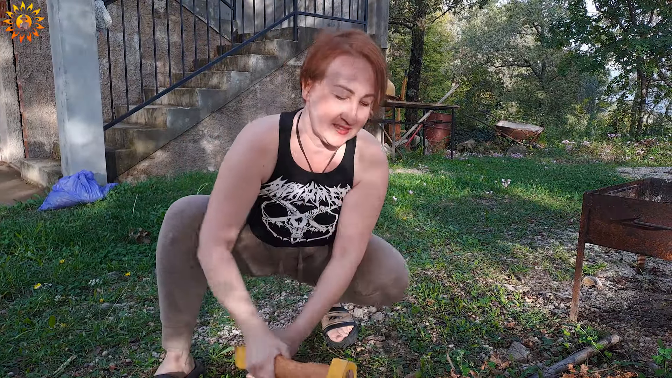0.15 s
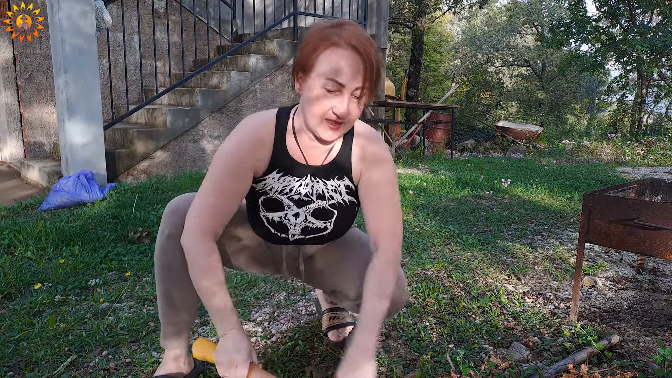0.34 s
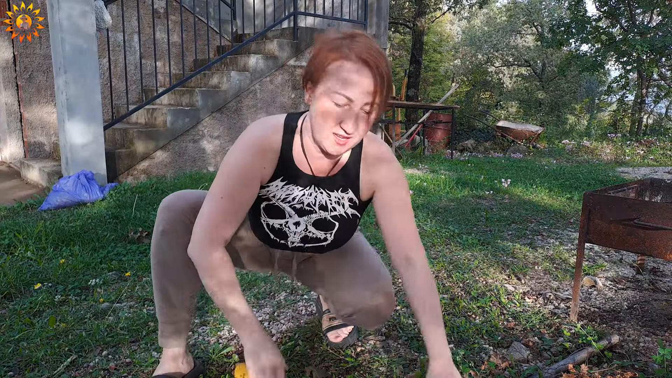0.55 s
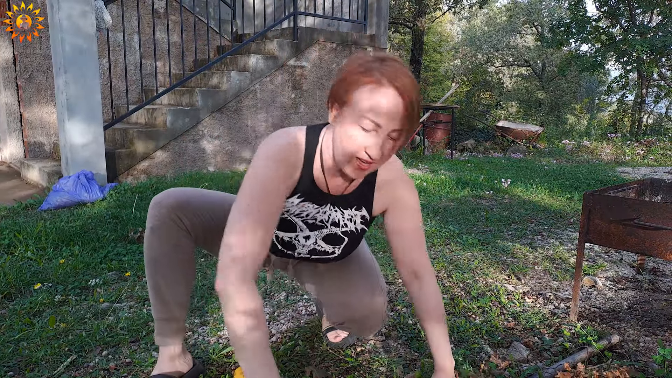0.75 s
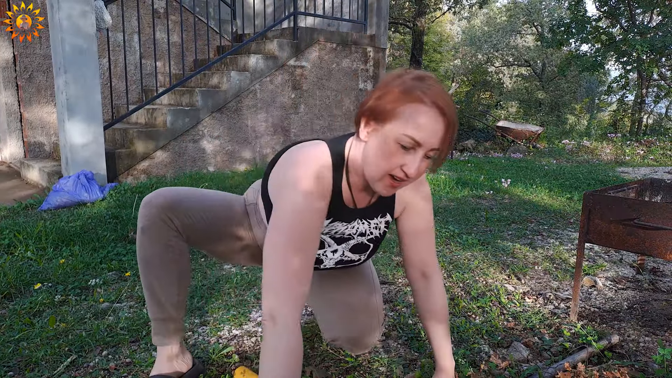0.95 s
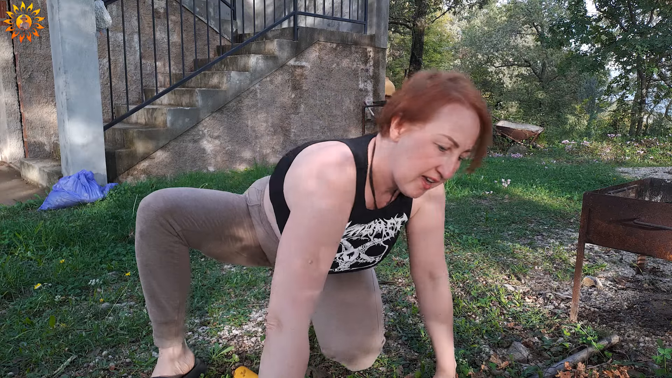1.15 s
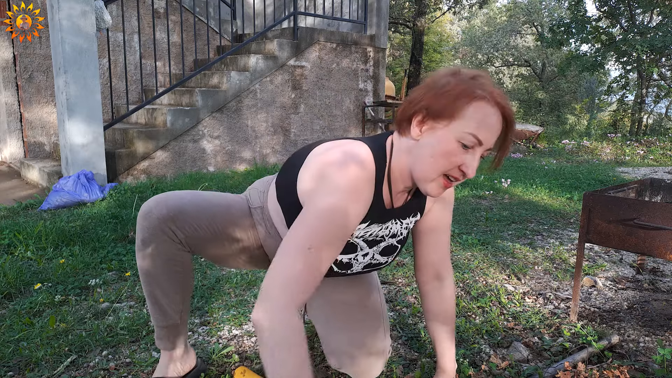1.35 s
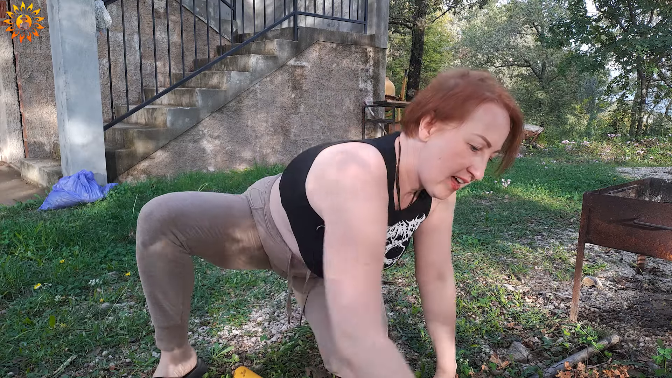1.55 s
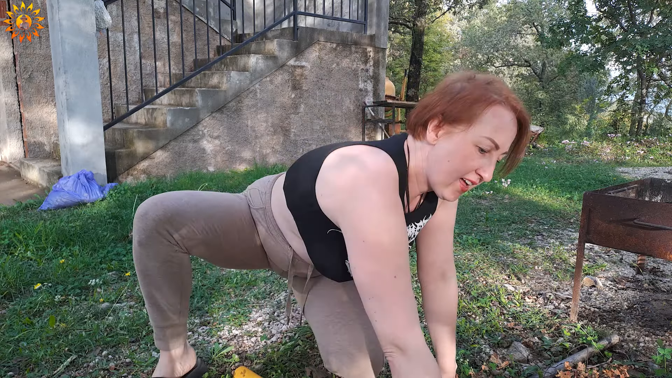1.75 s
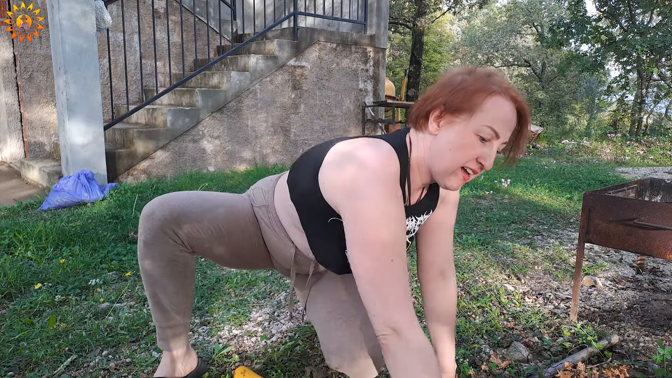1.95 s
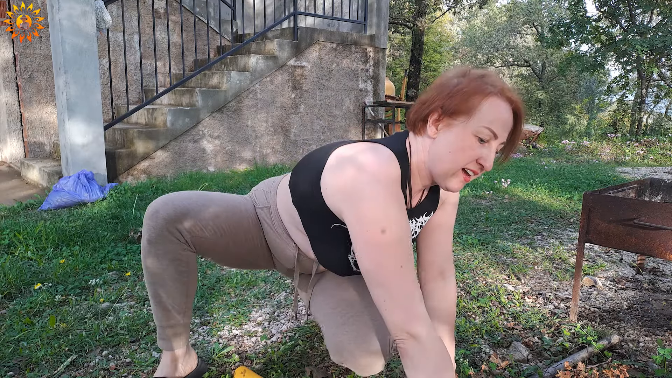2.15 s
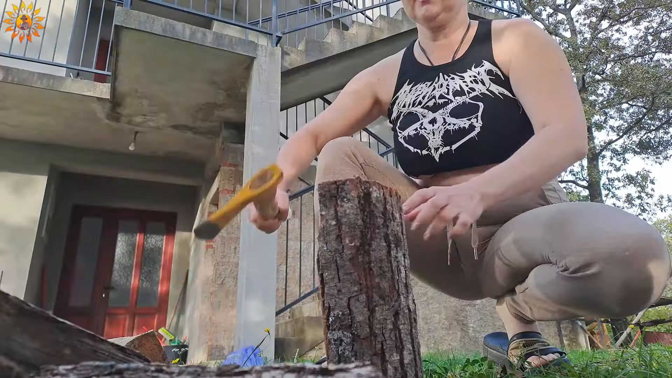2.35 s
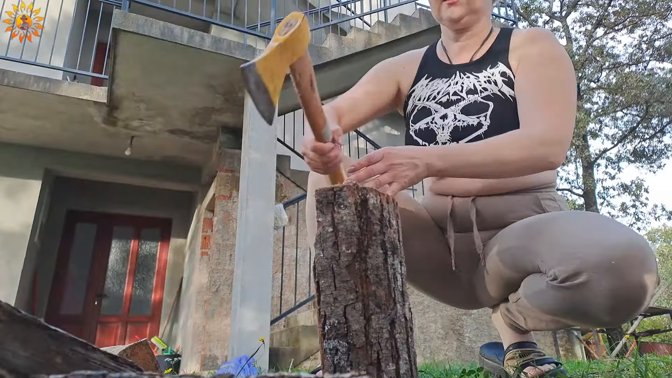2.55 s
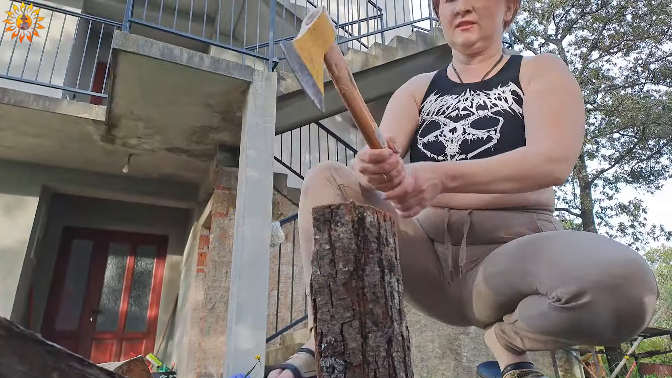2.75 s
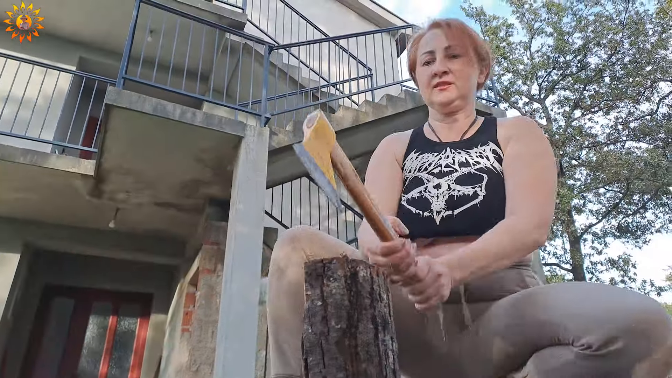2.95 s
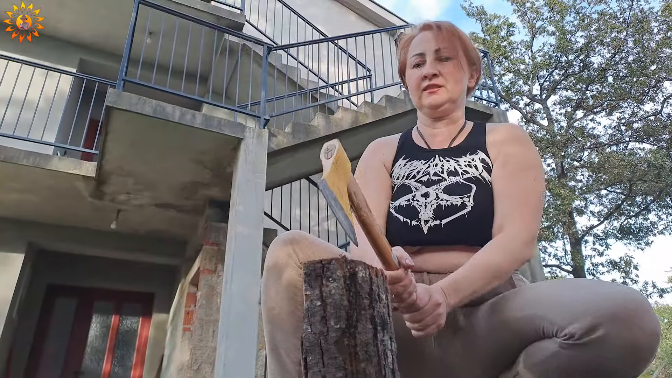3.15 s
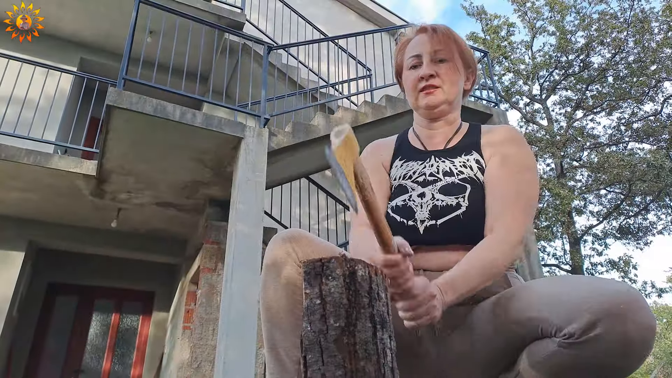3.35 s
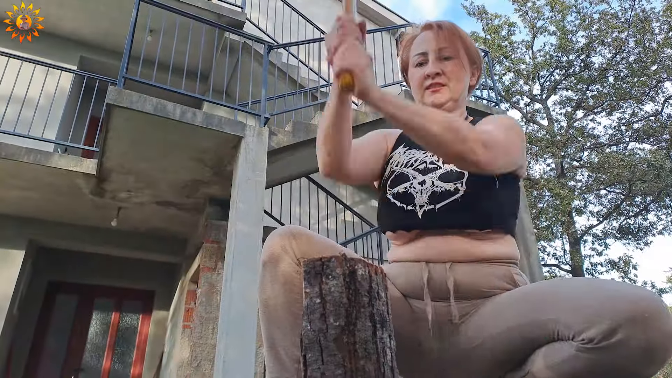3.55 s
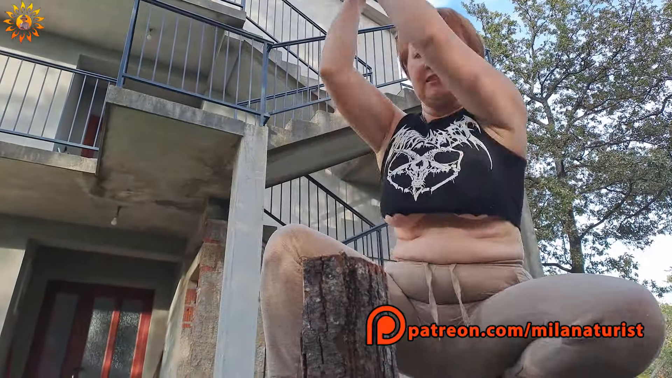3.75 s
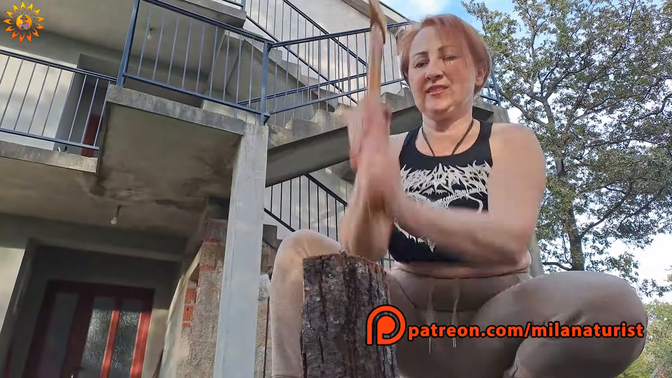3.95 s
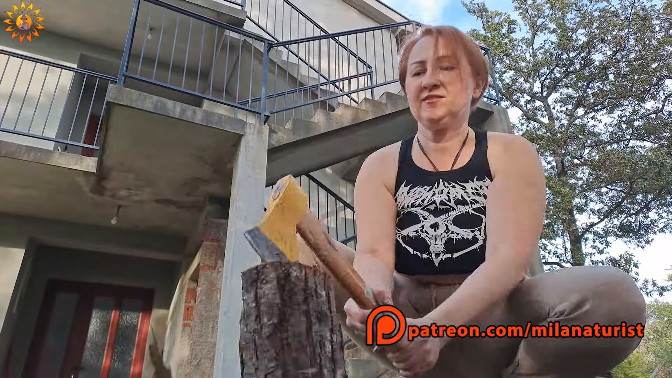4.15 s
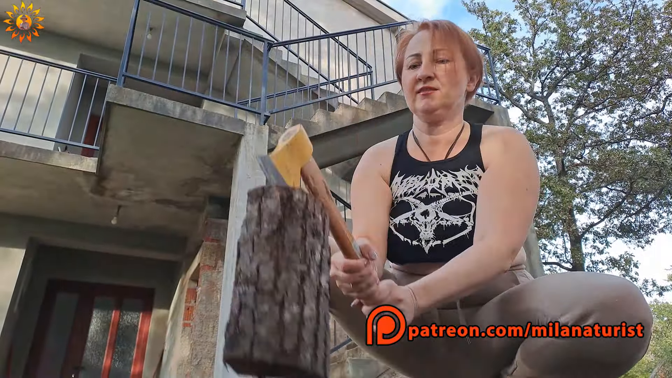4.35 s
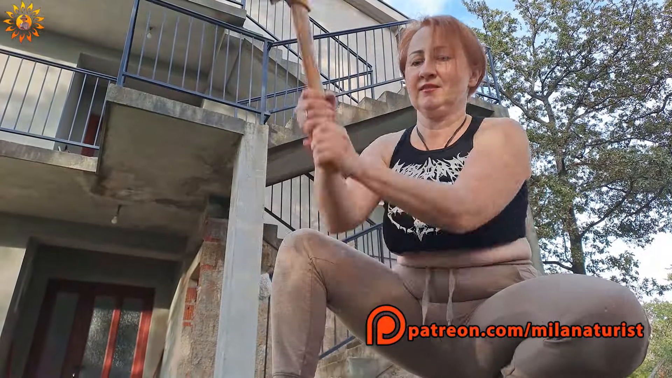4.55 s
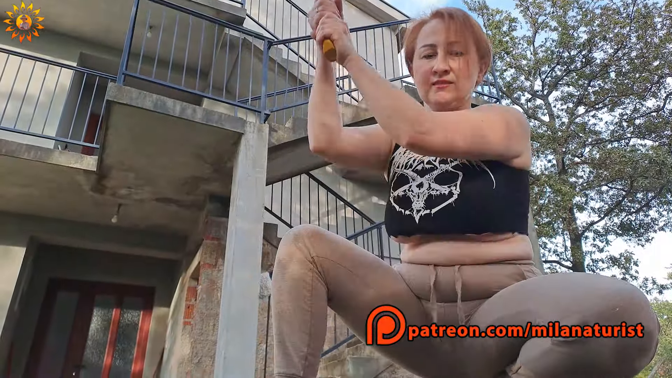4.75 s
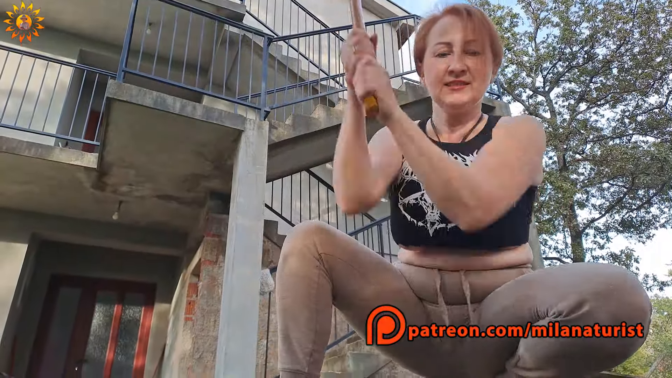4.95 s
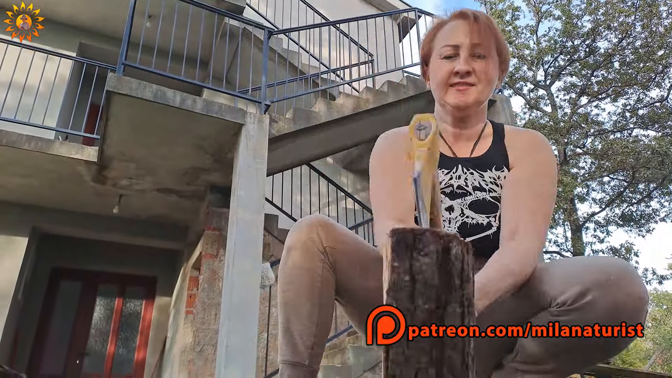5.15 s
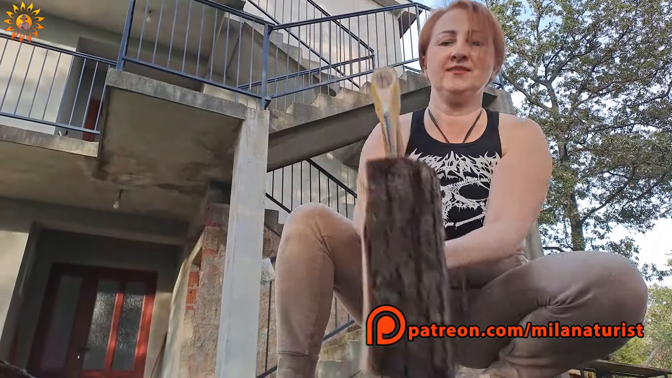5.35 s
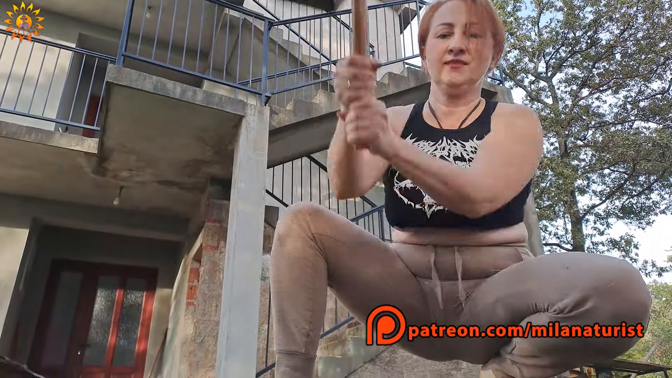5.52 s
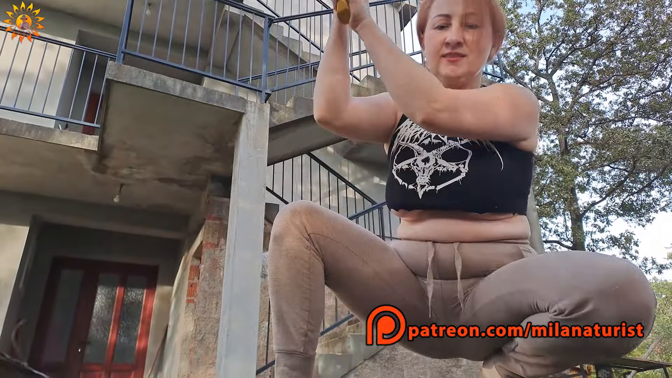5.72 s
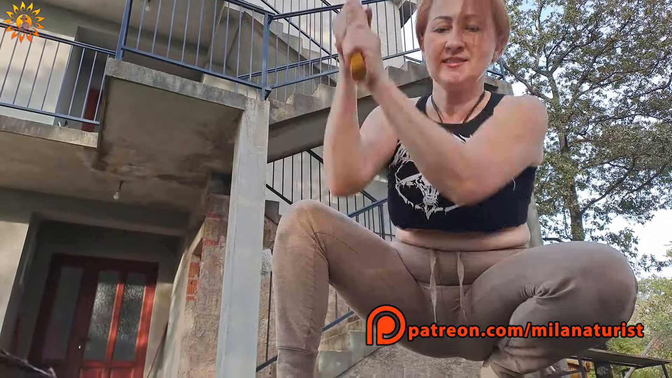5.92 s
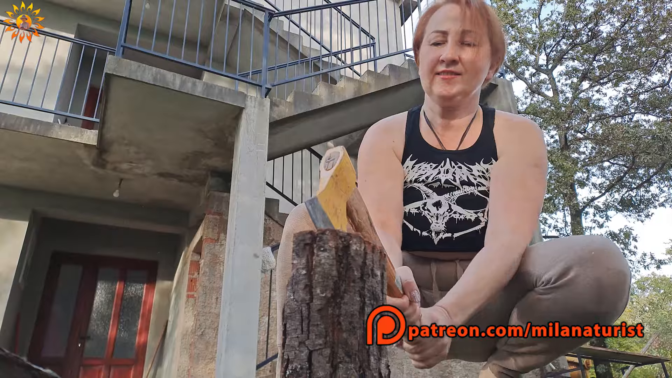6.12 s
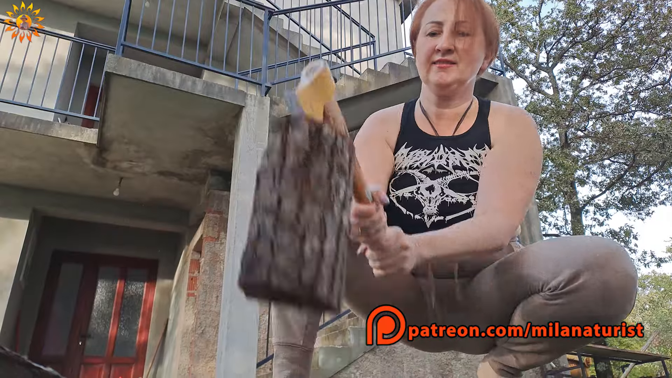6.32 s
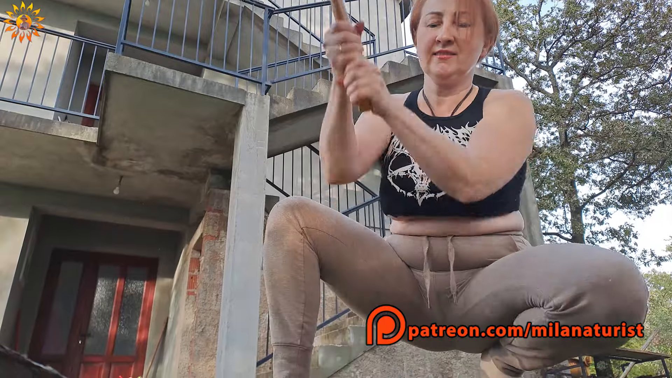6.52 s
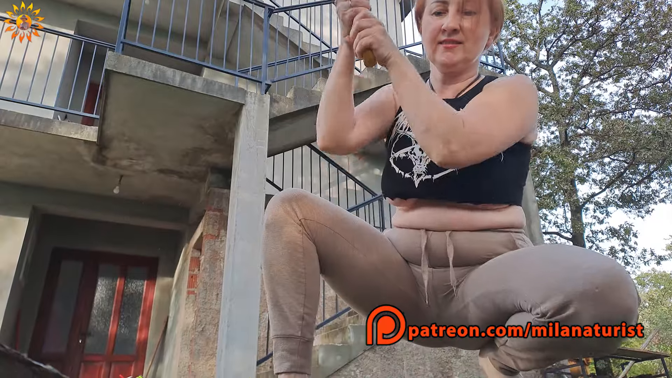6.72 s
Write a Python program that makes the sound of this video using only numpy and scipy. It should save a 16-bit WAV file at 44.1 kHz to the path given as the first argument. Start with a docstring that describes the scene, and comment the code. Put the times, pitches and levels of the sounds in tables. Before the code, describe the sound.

A hatchet head rings as it is tossed aside and sticks clack over an engine drone, then three echoing chops hit a log.

```python
"""A hatchet's steel head rings as it is tossed aside and dry sticks knock together, over the drone of an engine.
Then the drone stops, a hand brushes bark and three blows land on an upright log, each with an echo and splinters.
Shaped noise makes the backgrounds, rustles and cracks; dying sine waves make steel, sticks, log and taps.
Noise bursts that follow the blows are the echo off the house. Two microphones stand a hand apart."""
import sys
import numpy as np
from scipy import signal
from scipy.fft import rfft, irfft, next_fast_len
from scipy.io import wavfile
from scipy.ndimage import uniform_filter1d

SR = 44100
rng = np.random.default_rng(int(sys.argv[2]) if len(sys.argv) > 2 else 0)


def file_out(sig):
    """Save sig as 16-bit WAV at sys.argv[1]."""
    # one column per channel
    cols = np.atleast_2d(sig).T
    # limit, then scale
    lim = np.clip(cols, -1, 1)
    pcm = np.round(lim * 32767).astype(np.int16)
    wavfile.write(sys.argv[1], SR, pcm)


N = 298997
T = np.arange(N) / SR

# The engine drawing nearer. Each row: time in seconds, then levels of hum, roar and treble in dB.
ENGINE_LEVELS = [(0, -42, -59, -71), (.2, -42.5, -62, -90.5), (.48, -42, -63, -81.5),
                 (.65, -39.5, -59.5, -73), (.92, -43, -59.5, -86), (1.25, -40, -54, -83),
                 (1.55, -43.5, -52, -75), (1.82, -34.5, -46.5, -64), (1.99, -35.5, -47.5, -72),
                 (2.09, -31, -49.5, -71), (2.18, -32.5, -49.5, -68.5), (2.28, -43.5, -51, -68)]
# Fibres tearing at each blow. Each row: start in seconds, level in dB, length in seconds,
# left over right in dB, extra level thrown towards the house in dB.
FIBRE_CRACKS = [(4.0299, -21, 0.006, 1, 2.5), (5.103, -19, 0.0073, 1, -10), (6.058, -17.5, 0.008, 2.5, 1.5)]


def from_db(db):
    """Turns decibels into a plain multiplier."""
    return 10 ** (np.asarray(db) / 20)


def rms_one(x):
    """Scales a sound to an average strength (RMS) of 1."""
    return x / np.sqrt(np.mean(x ** 2) + 1e-20)


def at_hz(points, hz):
    """Reads a curve of (Hz, value) points, with pitch on a logarithmic scale."""
    points = np.array(points)
    return np.interp(np.log(hz + 1), np.log(points[:, 0]), points[:, 1])


def coloured(x, spectrum):
    """Filters each channel with a curve of (Hz, dB) points."""
    hz = np.fft.rfftfreq(x.shape[-1], 1 / SR)
    return irfft(rfft(x) * from_db(at_hz(spectrum, hz)), x.shape[-1])


def sides(pan_db):
    """Left and right multipliers; a positive value makes the left louder."""
    return from_db(np.array([[.5], [-.5]]) * pan_db)


def add(out, x, s):
    """Mixes x into out from time s in seconds."""
    i = round(s * SR)
    out[..., i:i + x.shape[-1]] += x[..., :N - i]


def decay(t60, size):
    """A fade that loses 60 dB in t60 seconds."""
    return from_db(-60 * np.arange(size) / SR / max(t60, .001))


def drift(rate):
    """A slow random curve: straight lines between normal random values, two times rate of them a second."""
    knots = np.arange(0, T[-1] + 1, .5 / rate)
    return np.interp(T, knots, rng.standard_normal(len(knots)))


def ring(push, hz, t60):
    """A resonance: a unit click sets a sine of height 1 ringing, which loses 60 dB in t60 seconds."""
    r, w = from_db(-60 / (t60 * SR)), 2 * np.pi * hz / SR
    return signal.lfilter([0, np.sin(w)], [1, -2 * r * np.cos(w), r * r], push + 1e-18)


def band_levels(rows, follows):
    """Times and five band levels from three curves; two bands follow part of a neighbour's swing."""
    s, bass, middle, treble = np.transpose(rows)
    (low_db, low_share), (high_db, high_share) = follows
    low = low_db + low_share * (middle - middle.mean())
    high = high_db + high_share * (treble - treble.mean())
    return s, bass, low, middle, high, treble


def background(levels, spectrum, hums, patchy_db):
    """Stereo noise, alike in the bass; each octave follows the band levels and flickers on its own."""
    # The five bands whose levels are set. Each row: lower and upper edge in Hz.
    bands = [(40, 130), (130, 500), (500, 4200), (4700, 8000), (9000, 12300)]
    # How alike left and right are. Each row: Hz, likeness from -1 (opposite) to 1 (same).
    likeness = [(110, 0.98), (290, 0.7), (640, 0.45), (1400, 0.06), (3000, -0.37)]
    size = next_fast_len(N)
    hz = np.fft.rfftfreq(size, 1 / SR)
    alike = np.clip(at_hz(likeness, hz), -1, 1)
    mid, side = rfft(rng.standard_normal((2, size))) * from_db(at_hz(spectrum, hz))
    both = np.sqrt(1 + alike) * mid + np.sqrt(1 - alike) * side * [[1], [-1]]
    for hum_hz, width, lift_db in hums:
        both = both * (1 + (from_db(lift_db) - 1) / (1 + (2 * (hz - hum_hz) / width) ** 2))
    # how far each band must be raised to reach its set level
    power = 2 * np.abs(both.mean(axis=0)) ** 2 / size ** 2
    s, *columns = levels
    lifts = []
    for column, (low, high) in zip(columns, bands):
        lifts.append(column - 10 * np.log10(power[(hz >= low) & (hz < high)].sum()))
    band_centres = np.sqrt(np.prod(bands, axis=1))
    out = 0
    for centre in 2. ** np.arange(5, 15):
        # neighbouring octaves overlap and add up to the whole
        share = np.clip(1 - np.abs(np.log2(np.clip(hz, 32, 16384) / centre)), 0, 1)
        lift_db = [np.interp(np.log(centre), np.log(band_centres), row) for row in np.transpose(lifts)]
        level_db = np.interp(T, s, lift_db) + patchy_db * drift(9)
        out = out + irfft(both * share, size)[:, :N] * from_db(level_db)
    return out


def quiet_yard():
    """Far traffic and air: shaped noise with a faint band of hiss."""
    # Each row: time in seconds, then levels of bass, middle and treble in dB.
    rows = [(2.3, -61, -68.5, -81.5), (2.45, -67.5, -65.5, -80.5), (2.92, -68.5, -60.5, -81),
            (3.7, -63.5, -71.5, -86), (4.1, -57, -70, -83.5), (4.33, -68.5, -79, -89.5),
            (4.8, -68, -81.5, -96.5), (5.22, -60, -71.5, -77), (5.55, -60, -74, -91),
            (5.9, -60.5, -69.5, -93.5), (6.19, -54.5, -67.5, -74.5), (6.36, -65, -78.5, -91.5),
            (6.78, -60, -71, -90)]
    # The two bands in between. Each row: mean level in dB, share of the middle's or treble's swing.
    follows = [(-66.5, 0.2), (-86.5, 1.5)]
    # Shape of the noise. Each row: Hz, relative level in dB.
    colour = [(15, -46), (25, -13.5), (53, 6.5), (86, -7), (113, 1), (141, -11), (165, -12.5), (291, -20),
              (333, -11.5), (654, -21.5), (834, -24.5), (1780, -30.5), (2030, -33.5), (4570, -39),
              (12000, -41), (16000, -57.5)]
    # Each row: hiss centre in Hz, width in Hz, lift above its surroundings in dB.
    hiss = [(5500, 2500, 9)]
    return background(band_levels(rows, follows), colour, hiss, patchy_db=.8)


def firing_tone():
    """The engine's firing: a steady tone, wavering a little, that swells with the hum."""
    s, hum_db, *_ = np.transpose(ENGINE_LEVELS)
    hz = 90.8 + 1.5 * drift(4)
    level_db = np.interp(T, s, hum_db) - 1.5
    return from_db(level_db) * np.sin(2 * np.pi * np.cumsum(hz) / SR)


def engine():
    """The drone: shaped noise with narrow hums, plus the firing tone."""
    # The two bands in between. Each row: mean level in dB, share of the roar's or treble's swing.
    follows = [(-42.5, 0.4), (-65.5, 0.32)]
    # Shape of the noise. Each row: Hz, relative level in dB.
    colour = [(15, -52.5), (25, -15), (96, -3), (123, -8.5), (205, -8.5), (241, -16), (316, -17),
              (361, -13.5), (414, -23.5), (542, -29), (654, -28.5), (1160, -38), (1900, -34), (2270, -34),
              (2950, -41.5), (3450, -38.5), (5500, -46), (8270, -55), (15700, -51.5), (16100, -80.5)]
    # Each row: hum pitch in Hz, width in Hz, lift above the drone in dB.
    hums = [(96, 3, 8.5), (364.6, 6.4, 7)]
    roar = background(band_levels(ENGINE_LEVELS, follows), colour, hums, patchy_db=2.0)
    return roar + firing_tone()


def bird():
    """A far bird: thin whistles, each sliding from one pitch to another."""
    # Each row: start in seconds, length in seconds, first pitch in Hz, last pitch in Hz, level in dB.
    chirps = [(1.282, 0.13, 5460, 5800, -62), (1.462, .035, 5050, 4840, -60), (1.68, 0.12, 5260, 5330, -58)]
    out = np.zeros(N)
    for s, length, start_hz, end_hz, db in chirps:
        hz = np.linspace(start_hz, end_hz, round(length * SR))
        add(out, from_db(db) * np.hanning(len(hz)) * np.sin(2 * np.pi * np.cumsum(hz) / SR), s)
    return out


def rustles():
    """Bark, grass and cloth: dense uneven grains of noise in a broad band, under a quick swell."""
    # Each row: start in seconds, level in dB, length in seconds, centre in Hz, left over right in dB.
    rows = [(0.133, -57, 0.052, 9000, 8.5), (0.461, -52.5, 0.048, 5960, 2), (0.651, -56.5, 0.12, 9000, -2),
            (1.861, -55.5, 0.2, 10200, -4.5), (2.55, -65, 0.18, 1590, 3), (2.692, -52, 0.068, 1000, 0.5),
            (2.901, -67, 0.35, 4170, 1.5), (3.221, -71.5, 0.46, 4350, 4.5), (2.798, -45, 0.11, 2400, 3.5),
            (2.857, -46.5, 0.087, 785, -4), (2.858, -64, 0.17, 3920, 6), (3.207, -55.5, 0.11, 3180, 1),
            (4.034, -52.5, .13, 2400, 0.5), (4.062, -42.5, 0.05, 3630, 2.5), (4.153, -46, 0.031, 3080, 0),
            (5.108, -43.5, 0.079, 5030, 1), (5.181, -56.5, 0.19, 4630, 0), (6.079, -41, 0.072, 4600, -0.5),
            (4.165, -68, 0.21, 4870, 0), (6.146, -65, 0.16, 6060, 3)]
    out = np.zeros((2, N))
    for s, db, length, hz, pan_db in rows:
        size = SR // 4 * (1 + int(4 * length))
        # every 63 samples the strength jumps
        jumps_db = 3.8 * np.minimum(rng.exponential(1, size // 63), 3.0)
        grains = rng.standard_normal((3, size)) * from_db(jumps_db).repeat(63)
        alike = np.exp(-hz / 1500)
        band = [(hz / 8, -22), (hz / 2, -4), (hz, 0), (hz * 2, -7), (hz * 8, -26)]
        sound = rms_one(coloured(alike * grains[0] + (1 - alike) * grains[1:], band))
        phase = np.clip(T[:size] / length, 0, 1)
        swell = np.sin(np.pi * phase ** 0.61) ** 1.9
        add(out, from_db(db) * sides(pan_db) * swell * sound, s)
    return out


def taps(rows, overtone):
    """A bare click of noise, then a short rough ring with one overtone (a pitch ratio)."""
    # Shape of the click. Each row: Hz, gain in dB.
    click_colour = [(300, -9.5), (1000, 5.5), (4000, -6.5), (8000, -17), (16000, -12.5)]
    out, size = np.zeros((2, N)), SR // 10
    for s, db, hz, click_db, pan_db, cycles in rows:
        noise = coloured(rng.standard_normal((2, size)), click_colour)
        click = from_db(click_db) * decay(0.0031, size) * noise
        turns = 2 * np.pi * hz * T[:size]
        rough = from_db(2.7 * rms_one(uniform_filter1d(rng.standard_normal(size), size=30)))
        rise = np.clip(T[:size] * hz / 0.37, 0, 1)  # full after 0.37 of a cycle
        tone = np.sin(turns) + 0.34 * np.sin(overtone * turns)
        body = rise * decay(cycles / hz, size) * rough * tone
        add(out, from_db(db) * sides(pan_db) * (body + click), s)
    return out


def splinters(count):
    """Rows of tiny taps after each blow, at random moments and pitches, fainter the later they fall."""
    low_hz, high_hz = 1800, 9000
    level_db, loss_db_per_s, span_s = -57, 57, 0.34
    rows = []
    for s, *_ in FIBRE_CRACKS:
        for late, weak, pitch, side in rng.random((count, 4)):
            wait = span_s * late
            db = level_db - loss_db_per_s * wait - 8 * weak
            hz = low_hz * (high_hz / low_hz) ** pitch
            rows.append((s + 0.016 + wait, db, hz, -13, 12 * (side - .5), 30.0))
    return rows


def wood_taps():
    """Small taps of wood and bark, and the splinters: each rings for a few cycles."""
    # Each row: start in seconds, level in dB, pitch in Hz, click over ring in dB, left over right in dB.
    rows = [(.006, -29.5, 780, 0, 8), (.153, -27, 756, -17, 5), (.467, -34, 2900, 0, -6),
            (.806, -44.5, 9000, 4, 0), (.847, -46, 8650, 11, -2), (1.109, -41, 6750, 3, 4),
            (1.173, -47, 8000, 0, 0), (1.467, -42, 9800, 0, 7), (1.885, -33, 885, -25, -1.5),
            (1.911, -30, 4450, -10, 1), (2.076, -34, 1260, 3, 12), (2.261, -31, 1180, -12, 10.5),
            (2.348, -33, 433, 4, 16), (2.384, -30, 550, -20, 8.5), (2.404, -41.5, 454, 7, -6),
            (2.465, -40, 647, 8, -8), (2.479, -45.5, 587, 0, 12), (2.71, -48.5, 890, 11.5, 21),
            (2.743, -37.5, 450, -16, -9), (2.76, -45.5, 1430, 1, 11), (2.8185, -35, 2000, 5, 11),
            (2.822, -25.5, 1120, -17, 10.5), (2.831, -34, 1700, 7, 7), (2.8378, -25, 2300, 5.5, 9),
            (2.8395, -24.5, 3200, -12, 9), (2.838, -31.5, 564, -20, 2), (2.86, -27, 640, -20, 0),
            (2.863, -25.5, 780, -20, 3), (2.867, -24.5, 795, -20, -9), (2.873, -29.5, 970, -25, 19),
            (2.888, -36, 795, -13, -2), (2.8915, -25.5, 735, -13, 3), (3.085, -48, 2920, -12, 11),
            (3.17, -45, 3620, -12, 19), (3.905, -53, 6460, -2, -4), (4.1605, -31.5, 1850, 1, 9),
            (4.165, -35, 1750, -5, 0), (4.17, -35, 430, -6, -3.5), (4.333, -52.5, 7100, 8, 2),
            (4.896, -54, 1096, 16, 13.5), (5.47, -53.5, 975, -8, 5.5), (5.545, -49, 841, -18.5, -4),
            (6.563, -57, 1066, -11, 7), (6.735, -54, 1050, -8, 0)]
    cycles = 9.7  # cycles in which the ring loses 60 dB
    return taps([(*row, cycles) for row in rows] + splinters(count=16), overtone=1.7)


def chip_pings():
    """Dry chips, made like the taps but ringing for more cycles."""
    # Each row: start in seconds, level in dB, pitch in Hz, click over ring in dB, left over right in dB,
    # cycles in which the ring loses 60 dB.
    rows = [(.479, -39.5, 2720, 19, -1, 98), (.481, -39, 1560, -3, -1, 54), (.486, -50, 2435, -20, 3, 460),
            (.568, -41, 2720, 11, 1, 105), (4.266, -53, 2130, 20.5, 8.5, 103),
            (5.217, -58, 2800, -8, 0, 40), (5.253, -56, 2800, -10, 0, 77)]
    return taps(rows, overtone=1.53)


def hatchet_head():
    """Steel modes share the tumbling head's pitch sag and lag; the lowest dips edge-on and dies on landing."""
    # Path of the head. Each row: time in seconds, left over right in dB, samples the left lags.
    path = [(0, 2.5, 6.5), (.05, 11, 3), (.11, -3.5, 0.5), (.23, -2, 0.3), (.29, 4, -1.5), (.33, -4, -2),
            (.47, -7, -0.5), (.56, 3, -2)]
    # The ring dips as the head turns edge-on. Each row: time in seconds, depth in dB, width in seconds.
    dips = [(0.059, 9.5, 0.018), (0.109, 13.5, 0.03), (.308, 6, 0.011), (0.383, 13, 0.012),
            (0.443, 15.5, 0.025)]
    # Pitches of the upper modes in Hz, before the sag.
    upper_hz = [8352, 12540, 13635, 6067]
    # The same modes. Each row: level in dB, seconds to lose 60 dB, left over right in dB.
    upper_modes = [(-38.5, 0.68, 4), (-52.5, .32, 9.5), (-43, 0.46, -13), (-57, 0.18, 11.5)]
    lowest_hz, sag_hz_per_s = 4421, 25.8  # the pitch sinks as the head flies off
    lands_s, landing_s, landing_loss_db = 0.469, 0.0077, 28  # the grass damps the ring
    still_s = 0.65  # then stills it
    s, pan_db, lag = np.transpose(path)
    t = T[T < still_s]
    left_late = np.array([[1], [0]]) * np.interp(t, s, lag) / SR
    clock = t - sag_hz_per_s / lowest_hz * t ** 2 / 2 - left_late
    level_db = -21.5 - landing_loss_db * np.clip((t - lands_s) / landing_s, 0, 1)
    for dip_s, dip_db, width in dips:
        level_db = level_db - dip_db * np.exp(-((t - dip_s) / width) ** 2)
    strength = from_db(level_db) * decay(2.33, len(t)) * sides(np.interp(t, s, pan_db))
    out = strength * np.sin(2 * np.pi * lowest_hz * clock)
    for mode_hz, (db, t60, mode_pan_db) in zip(upper_hz, upper_modes):
        turning = from_db(3.3 * drift(36.0)[:len(t)])
        strength = from_db(db) * sides(mode_pan_db) * turning * decay(t60, len(t))
        out += strength * np.sin(2 * np.pi * mode_hz * clock)
    return np.pad(out * np.clip((still_s - t) / 0.016, 0, 1), ((0, 0), (0, N - len(t))))


def sticks():
    """A snap of noise and the sticks' modes; each has a short-lived close twin and wavers as the stick spins."""
    # Each row: start in seconds, samples the left lags, then snap, first and second stick levels in dB.
    hits = [(0.095, 7.2, -50, -71.5, -49.5), (0.1344, 8.2, -21.5, -45, -25),
            (0.254, 7.9, -67.5, -72.5, -51), (1.638, 13, -35, -44.5, -41), (1.6439, 10.9, -17, -19, -22),
            (1.859, 6.6, -17, -31, -19), (2.195, 7.7, -35, -60, -41)]
    # Modes of the two sticks, one list each. Each row: pitch in Hz, level in dB, seconds to lose 60 dB.
    stick_modes = [
        [(1115, 0, 0.022), (1376, 5.5, 0.12), (2270, -7, 0.067), (3180, -4, 0.08), (5290, -17.5, 0.048)],
        [(802, -9, 0.011), (1100, -5.5, .02), (1323, -8, .12), (1547, 2, 0.1), (1700, -17.5, 0.063),
         (2000, -14.5, .025), (3100, -12, .03)],
    ]
    # Shape of the snap. Each row: Hz, relative level in dB.
    snap_colour = [(300, -17), (800, 3.5), (1500, 2.5), (3000, -7.5), (6000, -18.5), (11000, -22.5),
                   (16000, -15)]
    out, size = np.zeros((2, N)), SR // 4
    for s, lag, snap_db, *levels in hits:
        t = np.maximum(T[:size] - np.array([[lag], [0]]) / SR, 0)
        snap = rms_one(coloured(rng.standard_normal((2, size)), snap_colour))
        fade = decay(0.024, size) + 0.076 * decay(0.24, size)
        add(out, from_db(snap_db) * fade * snap, s)
        for modes, stick_db in zip(stick_modes, levels):
            for hz, db, t60 in modes:
                mode = decay(t60, size) * np.sin(2 * np.pi * hz * t)
                twin = 1.7 * decay(t60 / 7.2, size) * np.sin(2 * np.pi * 0.992 * hz * t)
                waver = from_db(2.5 * np.clip(t / .012, 0, 1) * drift(90)[:size])
                rise = np.clip(t / 0.00092, 0, 1)
                add(out, from_db(db + stick_db) * rise * waver * (mode + twin), s)
    return out


def thuds():
    """The log radiates the change of the contact force; the ground answers a moment later with a soft thump."""
    # The blade or the lifted log lands, two contacts a blow. Each row: start in seconds,
    # strike level in dB, contact time scale in ms, ground thump push in dB.
    contacts = [(4.029, -21.5, 0.78, -46.5), (4.0322, -1.5, 0.12, -13), (5.1039, -18, 0.49, -38),
                (5.1064, -3, 0.41, -6), (6.0576, -1, 0.19, -22), (6.0608, -7.5, 0.3, -11.5)]
    # Modes of the log. Each row: pitch in Hz, seconds to lose 60 dB.
    log_modes = [(305, 0.024), (372, 0.022), (470, 0.0097), (552, 0.02), (716, 0.026), (860, 0.017),
                 (1025, 0.022), (1505, 0.015), (2050, 0.027), (2200, 0.027)]
    # Each blow meets the log at another spot. Each row: one blow, level of each mode in dB.
    spots = [(-13.5, -1, 1.5, -4, -9, -11.5, -13.5, -15, -28, -28),
             (-0.5, -5.5, 0, -6, -14.5, -14.5, -15, -10, -15.5, -14),
             (-9.5, -5, -5.5, -7.5, -3, -10.5, -16.5, -11.5, -13, -12)]
    ground_hz, ground_t60_s, ground_late_s = 95, 0.048, 0.0015
    jolts, push = np.zeros((len(spots), N)), np.zeros(N)
    for k, (s, db, contact_ms, ground_db) in enumerate(contacts):
        x = T[:SR // 50] / (contact_ms / 1000)
        change = np.gradient(x ** 2 * np.exp(-x))  # the force rises, then dies away
        add(jolts[k // 2], -from_db(db) * change / np.abs(change).sum(), s)
        soft_push = np.hanning(SR // 170) / (SR // 340)
        add(push, -from_db(ground_db) * soft_push, s + ground_late_s)
    log = 0
    for (hz, t60), levels in zip(log_modes, np.transpose(spots)):
        log = log + ring(from_db(levels) @ jolts, hz, t60)
    return log + ring(push, ground_hz, ground_t60_s)


def yard_echo():
    """What one click sends back: bursts of noise from ground, stairs and walls, partly alike left and right."""
    # Each row: delay in seconds, level in dB, rise in seconds, seconds to lose 60 dB.
    bursts = [(.004, -21.5, 0.0077, 0.15), (.035, -23.5, .002, .018), (.042, -23, .002, .018),
              (.047, -18.5, .002, 0.02), (.055, -23.5, .001, .02), (.085, -34.5, .006, .04),
              (.056, -26.5, 0.012, .3)]
    # Shape of the whole echo. Each row: Hz, gain in dB.
    echo_colour = [(40, -11), (110, 0.5), (190, -2.5), (300, 4.5), (700, 4), (1200, -0.5), (4000, 5.5),
                   (15000, 3.5)]
    # The part that differs left and right. Each row: Hz, gain in dB.
    width_colour = [(150, -22), (1200, -5)]
    yard, size = np.zeros((2, N)), SR // 2
    for delay, db, rise, t60 in bursts:
        noise = rng.standard_normal((3, size))
        grain = 1.1 * noise[0] + coloured(noise[1:], width_colour)
        scatter = np.clip(T[:size] / rise, 0, 1) * decay(t60, size) * grain
        add(yard, from_db(db) * scatter / np.sqrt(SR * t60 / 14), delay)
    return coloured(yard[:, :SR], echo_colour)[:, :size]


def blows_and_echoes(knocks):
    """Thuds and tearing fibres, then what ground and house scatter back of these and of the knocks."""
    # Shape of the tearing noise. Each row: Hz, relative level in dB.
    crack_colour = [(200, -14), (550, 8), (1500, -3), (3000, -11), (5800, -5), (8000, -16), (12000, -7.5),
                    (16000, -7)]
    body, size = thuds(), SR // 10
    direct = body * sides(-.5)
    thrown = body + from_db(-5) * knocks  # what reaches the house
    for s, db, length, pan_db, thrown_db in FIBRE_CRACKS:
        t = T[:size]
        # quick rise, a hold for half the length, then a fade
        shape = np.clip(t / 0.00018, 0, 1) * from_db(-60 * np.maximum(t - length / 2, 0) / (3.3 * length))
        tearing = rms_one(coloured(rng.standard_normal((3, size)), crack_colour))
        crack = from_db(db) * sides(pan_db) * shape * (0.19 * tearing[0] + 1.23 * tearing[1:])
        add(direct, crack, s)
        # towards the house the crack blurs into one click
        far_crack = coloured(np.arange(size) == 99, crack_colour) * np.sqrt(length * SR)
        add(thrown, from_db(db + thrown_db) * far_crack, s)
    return direct + signal.fftconvolve(thrown, yard_echo(), axes=1)[:, :N]


def scene():
    """The drone gives way to the quiet yard in a few milliseconds; all other sounds lie on top."""
    drone_ends_s = 2.289
    fade = np.clip((drone_ends_s - T) / 0.0089, 0, 1)
    air = fade * engine() + (1 - fade) * quiet_yard()
    knocks = sticks()
    tossed = hatchet_head() + knocks
    small_sounds = wood_taps() + chip_pings() + rustles() + bird()
    return air + tossed + blows_and_echoes(knocks) + small_sounds


def record(dry):
    """The microphones lose the deepest bass; peaks are rounded, the top is cut."""
    bass_cut = signal.butter(4, 44, "high", fs=SR, output="sos")
    thin = signal.sosfilt(bass_cut, dry)
    rounded = 1.675 * np.tanh(thin / 1.42)
    top_cut = signal.cheby2(12, 70, 16800, fs=SR, output="sos")
    return signal.sosfilt(top_cut, rounded)


dry = scene()
out = record(dry)
file_out(out)
```